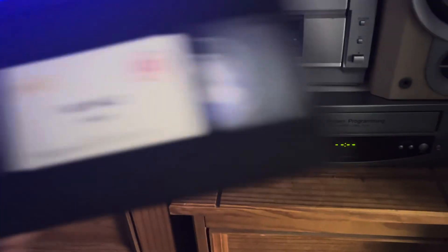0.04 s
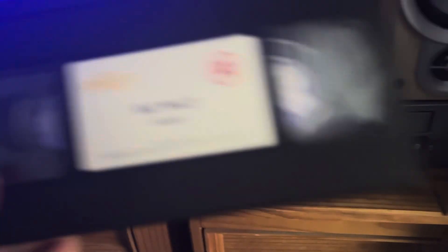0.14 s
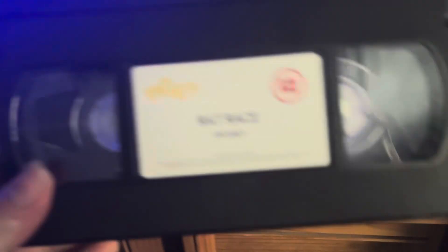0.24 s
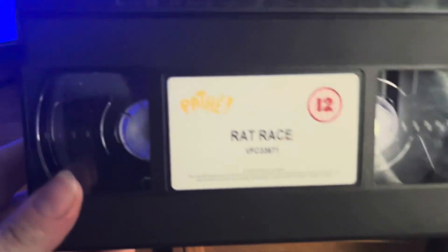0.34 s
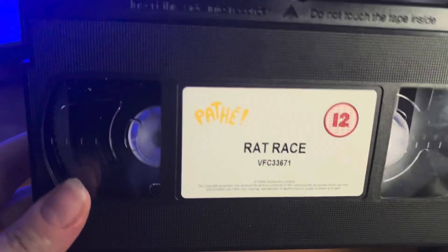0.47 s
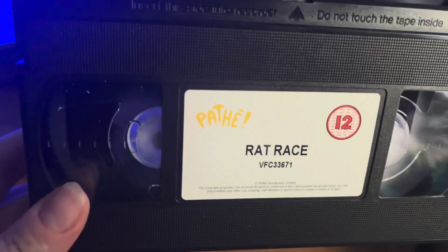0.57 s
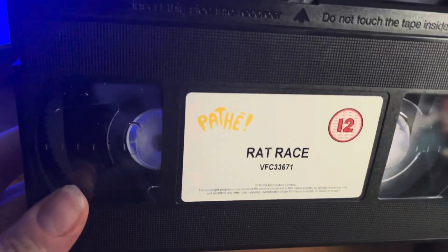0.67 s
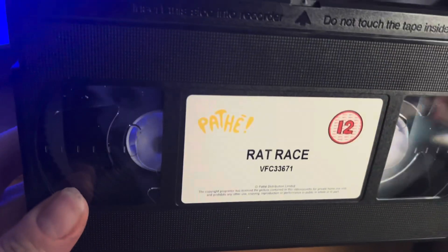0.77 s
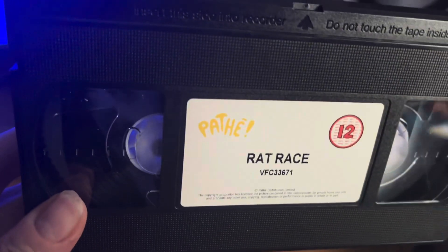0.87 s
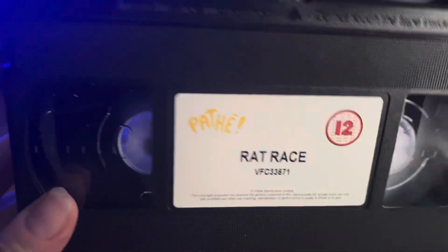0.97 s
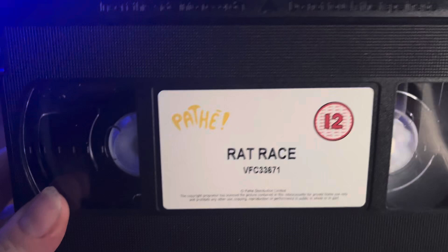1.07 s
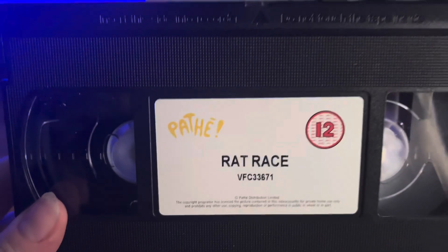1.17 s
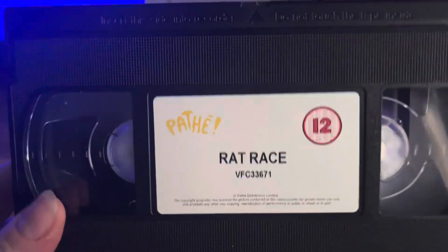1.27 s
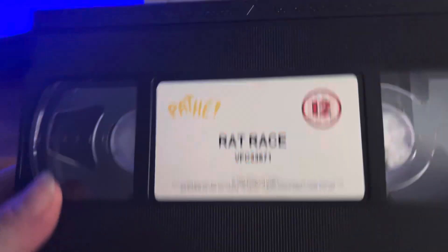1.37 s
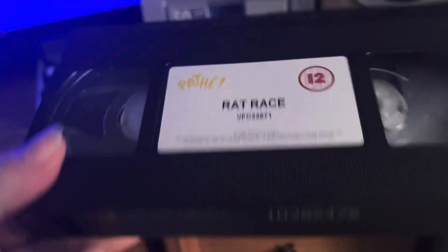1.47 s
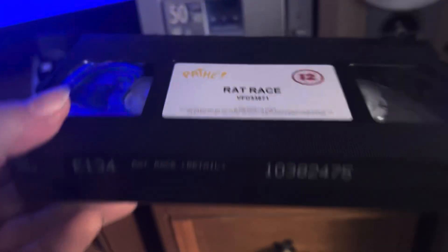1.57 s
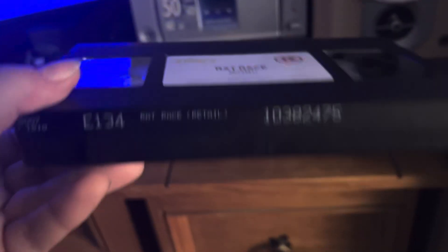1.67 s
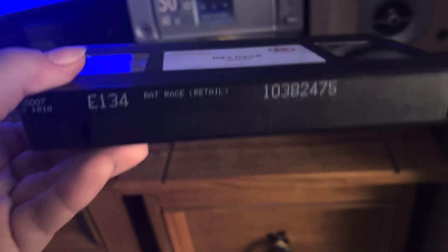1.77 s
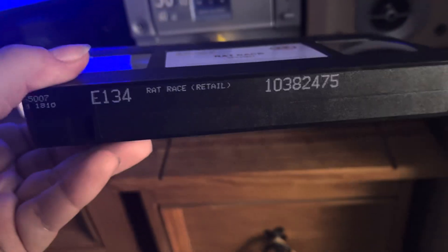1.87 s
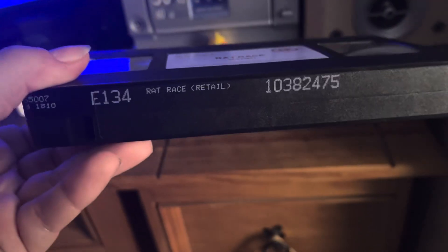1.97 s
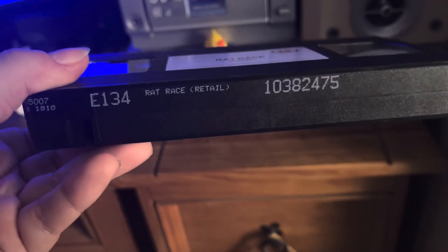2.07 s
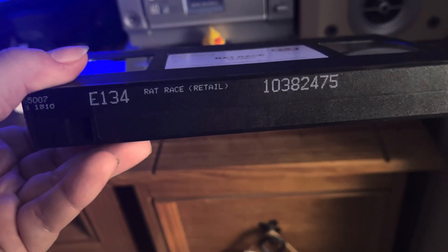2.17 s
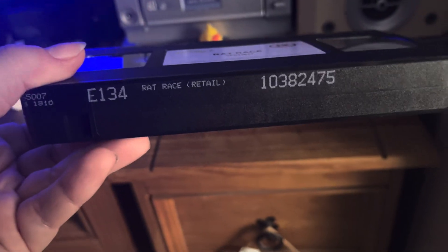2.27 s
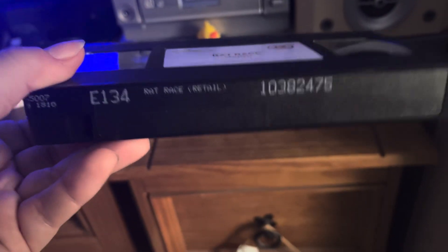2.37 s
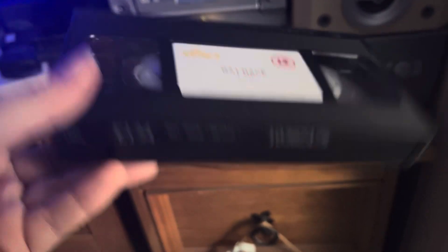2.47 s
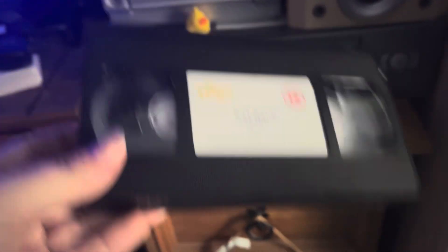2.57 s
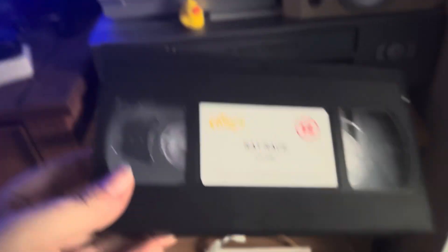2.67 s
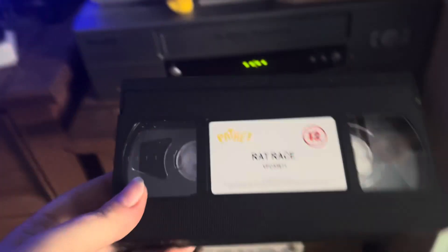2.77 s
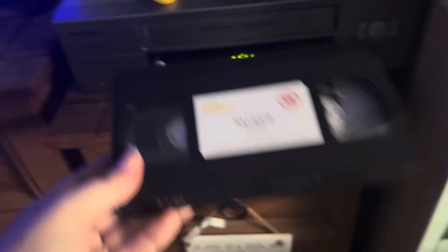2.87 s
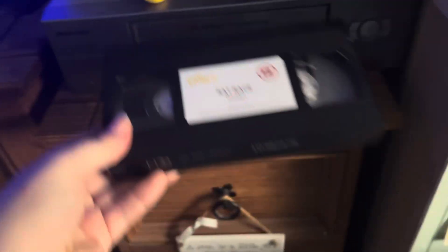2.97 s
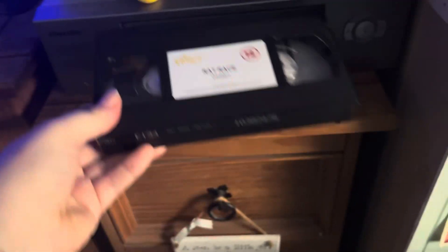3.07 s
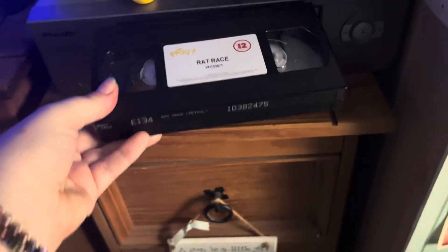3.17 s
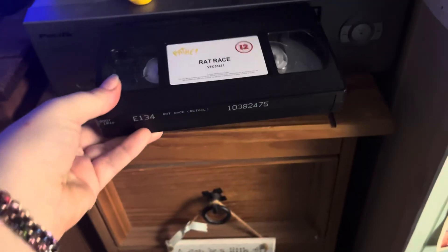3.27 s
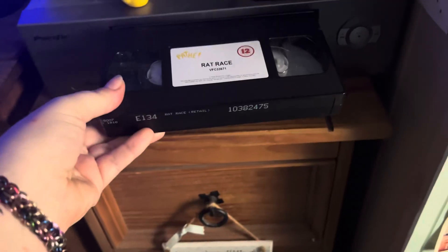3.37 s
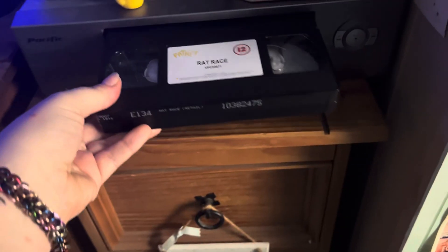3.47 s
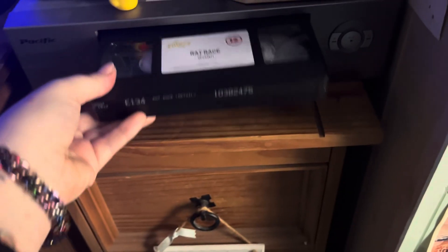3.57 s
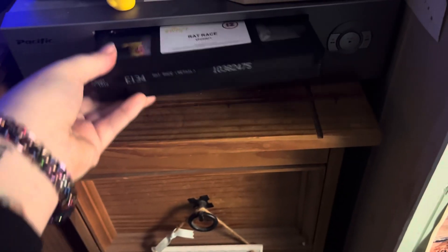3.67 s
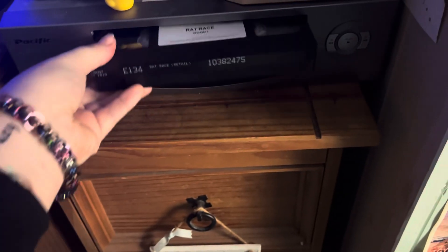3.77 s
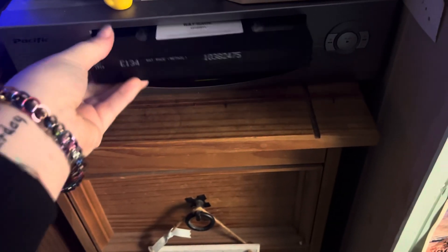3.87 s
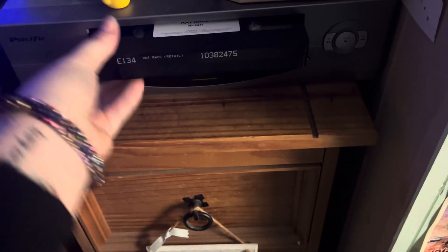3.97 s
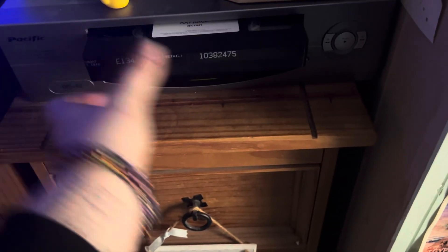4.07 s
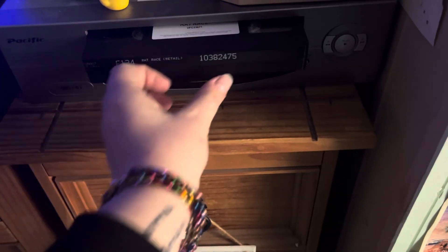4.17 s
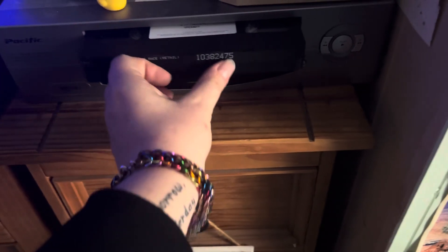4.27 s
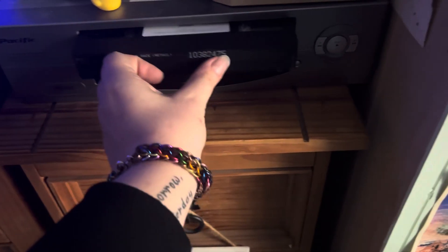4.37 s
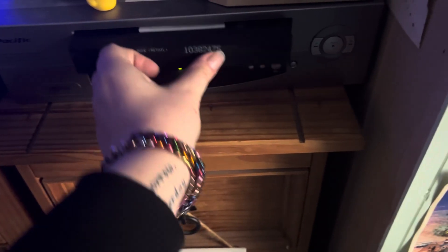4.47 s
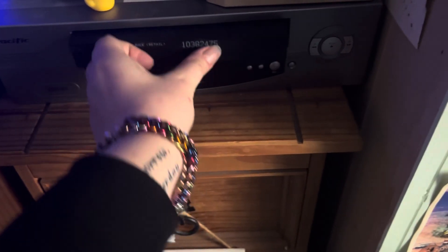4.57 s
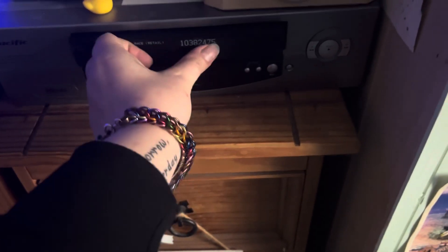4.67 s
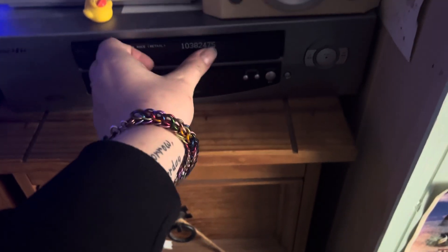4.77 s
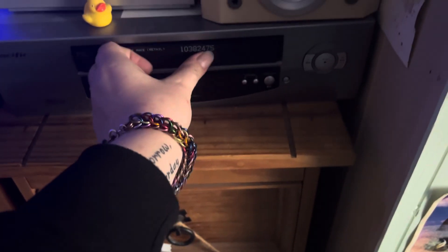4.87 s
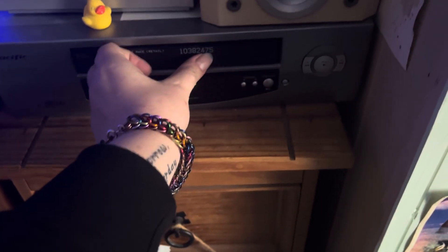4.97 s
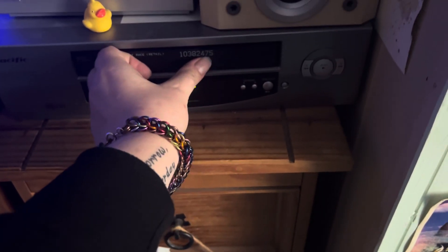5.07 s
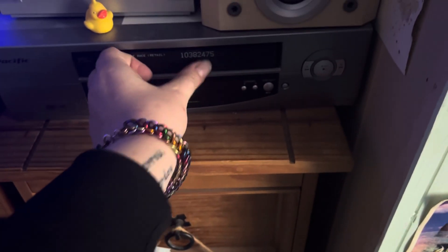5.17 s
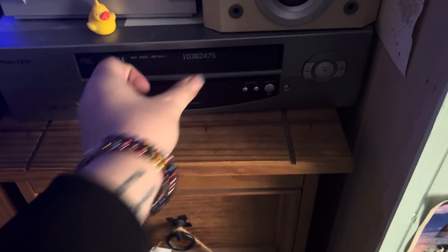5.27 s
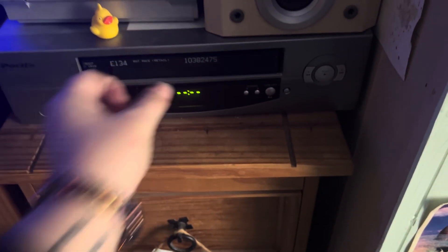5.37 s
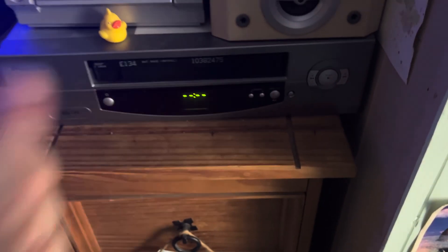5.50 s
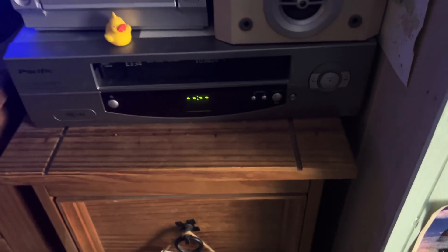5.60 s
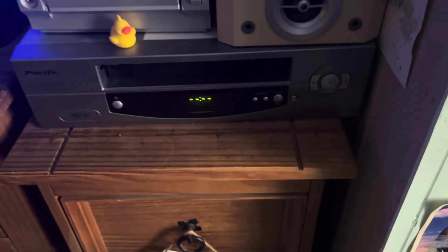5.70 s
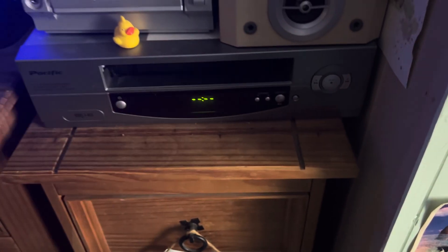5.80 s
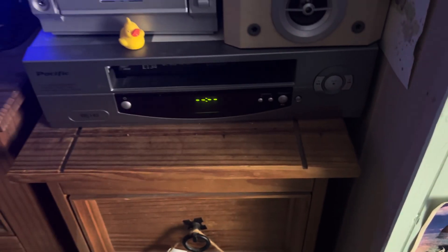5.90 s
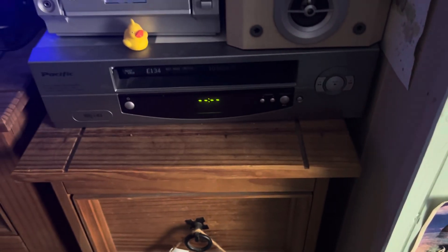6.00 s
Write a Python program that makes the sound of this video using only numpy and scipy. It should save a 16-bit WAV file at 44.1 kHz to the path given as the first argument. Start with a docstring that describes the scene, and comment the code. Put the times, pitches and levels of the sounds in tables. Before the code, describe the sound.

A plastic video cassette creaks in the hand, knocks against a recorder slot, scrapes in, clunks home and is drawn inside with clattering clicks.

```python
"""A small, quietly rumbling room with a wooden cabinet: a plastic video cassette creaks in a hand, is set into
the slot of a recorder, scrapes in, knocks home and is drawn inside by the loading gear. Creaks and knocks are
short noise forces on resonant modes of shell, hollow and cabinet; slides are long gritty forces on the same modes.
Sleeve, fingers and room are shaped noise. An echo tail follows the near sounds; a phone hears all at two ports."""
import sys
import numpy as np
from scipy import signal
from scipy.fft import rfft, irfft, next_fast_len
from scipy.io import wavfile
from scipy.ndimage import uniform_filter1d

SR = 44100
rng = np.random.default_rng(int(sys.argv[2]) if len(sys.argv) > 2 else 0)


def master(y):
    """Save y as 16-bit WAV."""
    cut = np.clip(np.atleast_2d(y).T, -1, 1)
    pcm = np.round(cut * 32767)  # scale
    wavfile.write(sys.argv[1], SR, pcm.astype(np.int16))


N = 266364
SIZE = next_fast_len(N + SR)  # room for the echo tail
HZ = np.maximum(np.fft.rfftfreq(SIZE, 1 / SR), 1)


def undb(db):
    """Decibel law: amplitude gain grows tenfold every 20 dB."""
    return 10 ** (np.asarray(db) / 20)


def level(x, db):
    """Root-mean-square level: scale a signal to it."""
    return x * undb(db) / np.sqrt(np.mean(x ** 2))


def over_hz(table, column):
    """Logarithmic frequency axis: a table column interpolated on it at every bin."""
    table = np.array(table)
    return np.interp(np.log(HZ), np.log(table[:, 0]), table[:, column])


def band(x, hz, width):
    """Simple resonance: gain 1 at the centre, falling to both sides."""
    return signal.lfilter(*signal.iirpeak(hz, hz / width, SR), x)


def flutter(depth_db, rate, size=N):
    """Random amplitude modulation: gains 1 / rate s apart, joined by straight lines."""
    count = int(size * rate / SR) + 2
    gains = undb(depth_db * rng.standard_normal(count))
    return np.interp(np.arange(size) * rate / SR, np.arange(count), gains)


def along(spans, fade_s=.015):
    """Piecewise-linear envelopes: table columns over time, and a gate that opens while a span lasts."""
    t, rows = np.arange(N) / SR, np.vstack(spans)
    gate = sum(np.clip(np.minimum(t - s[0][0], s[-1][0] - t) / fade_s + 1, 0, 1) for s in spans)
    return np.minimum(gate, 1), [np.interp(t, rows[:, 0], c) for c in rows.T[1:]]


# spectral density of room rumble and hiss: pitch_hz [Hz], density_db [relative dB per Hz]
RUMBLE_SPECTRUM = [(30, -78.5), (70, -61), (120, -71), (175, -56.5), (212, -64), (245, -63), (310, -72),
                   (450, -71), (800, -83), (1500, -92), (3000, -101), (6000, -111), (11300, -111),
                   (15000, -118)]
RUMBLE_DB = -55
# faint electrical whines: pitch_hz [Hz], width_hz [Hz], level_db [dB before flicker]
WHINE_BANDS = [(3900, 310, -89.5), (11400, 1300, -93.5)]


def rumble():
    """Coloured noise: bass octaves that flicker independently, with faint narrow-band whines on top."""
    noise = rfft(rng.standard_normal(SIZE)) * undb(over_hz(RUMBLE_SPECTRUM, 1))
    out = irfft(noise, SIZE)[:N]
    for hz in 60 * 2. ** np.arange(4):
        octave = irfft(noise * np.clip(1 - abs(np.log2(HZ / hz)), 0, 1), SIZE)[:N]
        out = out + (flutter(2.76, 11) - 1) * octave
    hiss = rng.standard_normal(N)
    whines = sum(level(band(band(hiss, hz, w), hz, w), db) for hz, w, db in WHINE_BANDS)
    return level(out, RUMBLE_DB) + flutter(0.83, 27.0) * whines


# reverberation time: pitch_hz [Hz], t60_s [s]
REVERBERATION = [(150, .12), (1000, .18), (4000, .16), (12000, .09)]
ROOM_DB = -11  # echo re direct sound


def room_tail():
    """Exponential decay of a diffuse field: spectrum of an echo tail that loses its treble first."""
    t = np.arange(SR // 2) / SR
    tail = np.zeros(len(t))
    for hz in 60 * 2. ** np.arange(9):
        t60 = np.interp(hz, *np.transpose(REVERBERATION))
        octave = band(rng.standard_normal(len(t)), hz, hz)
        tail += octave * np.sqrt(1 / (hz * t60)) * undb(-60 * t / t60)
    tail /= np.sqrt(np.sum(tail ** 2))  # unit energy before the soft start
    return rfft(tail * np.minimum(t / 0.013, 1), SIZE)


# sleeve rustling as the arm reaches out, one list per span: start_s [s], level_db [dB]
SLEEVE_SPANS = [
    [(2.45, -99), (2.8, -80.5), (3.05, -77), (3.25, -75.5)],
]


def sleeve():
    """Friction noise of cloth: many small contacts in one broad band."""
    gate, (db,) = along(SLEEVE_SPANS)
    rustle = band(grit(N, scatter_db=0.5, per_s=170), hz=2092, width=1150)
    return gate * undb(db) * level(rustle, 0)


# fingers slipping off the plastic, one list per span: start_s [s], level_db [dB before flicker]
FINGER_SPANS = [
    [(3.96, -71), (4.11, -71.5), (4.2, -86)],
]
# colour of skin on plastic: pitch_hz [Hz], width_hz [Hz], gain_db [relative dB]
SKIN_BANDS = [(2600, 700, -5), (3200, 800, -4), (5200, 1300, 0), (9000, 6000, -14)]


def fingers():
    """Friction noise of skin on plastic: a soft hiss of overlapping broad bands."""
    gate, (db,) = along(FINGER_SPANS)
    noise = rng.standard_normal(N)
    hiss = sum(undb(g) * band(band(noise, hz, w), hz, w) for hz, w, g in SKIN_BANDS)
    return gate * undb(db) * flutter(2.2, 20) * level(hiss, 0)


def grit(size, scatter_db, per_s):
    """Asperity contact: noise made of small contacts of very unequal strength."""
    hold = int(SR / per_s)
    strength = undb(scatter_db * np.minimum(rng.exponential(size=size // hold + 1), 3.5))
    return level(rng.standard_normal(size) * np.repeat(strength, hold)[:size], 0)


def crack(x, low_hz=5000, high_hz=11500):
    """Contact stiffness: a hard contact has a sharp top, here a high band of its force."""
    x = signal.lfilter(*signal.butter(2, low_hz, "high", fs=SR), x)
    return signal.lfilter(*signal.butter(1, high_hz, fs=SR), x)


CABINET_TOP_HZ = 694


def sluggish(force):
    """Inertia: the heavy cabinet follows only the slow part of a force."""
    return signal.lfilter(*signal.butter(2, CABINET_TOP_HZ, fs=SR), force)


def favour(modes, centre_hz, focus_db, octaves, scatter_db):
    """Selective excitation: the spot that is struck favours the modes near one pitch."""
    near = np.log2(np.array(modes)[:, 0] / centre_hz) / octaves
    return undb(focus_db * np.exp(-near ** 2) + scatter_db * rng.standard_normal(len(modes)))


# modes of cassette shell, hollow and wooden cabinet: pitch_hz [Hz], width_hz [Hz], peak_db [relative dB]
SHELL_MODES = [(1384, 264, 5), (1733, 59, 9), (1884, 79, 5), (2160, 270, 3.5), (2560, 383, 3),
               (2960, 290, 5.5), (3180, 560, 2.5), (3850, 480, 3.5), (4310, 580, -1.5), (5180, 770, -9.5),
               (5290, 81, -2), (7550, 2000, -4.5)]
HOLLOW_MODES = [(479.5, 59, -3), (658.5, 47, -1.5), (743.8, 25, 0), (840, 53, 0), (960, 67, -2.5),
                (1170, 114, -4.5)]
CABINET_MODES = [(95, 57, -15), (154.6, 40, -2), (195, 44, -3), (236, 45, -5), (285.3, 35.6, 2),
                 (312.8, 30.4, 3), (372, 60, -7.5), (432, 47, -5.5)]


def ring(x, modes, gains, detune=0):
    """Modal superposition: a force drives every mode, and neighbours add with opposite signs."""
    shifts = 1 + detune * rng.standard_normal(len(modes))
    out = 0
    for k, ((hz, width, db), gain, shift) in enumerate(zip(modes, gains, shifts)):
        out = out + (-1) ** k * gain * undb(db) * band(x, hz * shift, width)
    return out


# plastic sliding on the guides, pushed by hand, then drawn by the gear, one list per span: start_s [s],
# shell_db [dB before flicker], hollow_db [dB re shell], cabinet_db [dB re shell]
SLIDE_SPANS = [
    [(3.28, -60, 11.5, -3), (3.39, -56, 6.5, 5), (3.46, -61, 15.5, 16.5), (3.53, -52.5, 8, 12.5),
     (3.57, -45, 11, -1), (3.62, -38.5, 3, -7.5), (3.66, -38.5, 0, 6.5), (3.72, -51.5, 0.5, 8.5),
     (3.77, -61.5, 0, 9), (3.83, -57.5, 6, 1)],
    [(4.37, -74.5, 1, 10), (4.44, -63, 4.5, 2.5), (4.51, -52.5, -5.5, 13.5), (4.56, -55.5, 5, 5.5),
     (4.62, -51, 1.5, 6), (4.65, -61, 4.5, 22)],
    [(4.73, -63, 7.5, 20), (4.78, -63.5, 5.5, 13.5), (4.83, -69, -5, 8.5)],
    [(4.98, -88, 0.5, 21.5), (5.04, -77, 13.5, 19), (5.12, -85.5, 13, 26.5), (5.24, -85.5, 18, 31.5),
     (5.34, -74, 4.5, 22.5)],
    [(5.365, -60, 8, 12), (5.41, -53, -2.5, 3.5), (5.46, -69, -5, 13), (5.54, -57.5, 2.5, 10),
     (5.62, -65.5, 5, 16), (5.67, -69.5, 8, 28.5), (5.71, -59, 2, -2)],
    [(5.738, -42, -8, 0.5), (5.8, -39.5, -9, -7.5), (5.86, -48.5, -3, 9.5), (5.905, -70.5, 8, 15),
     (5.95, -41, -6.5, 8.5), (6.04, -56, -2, 3)],
]
SLIDE_FROM = int(3.2 * SR)  # samples of silence before the first slide
SLIDE_CRACK_DB = -17.5  # re shell


def slide():
    """Stick-slip friction of plastic on plastic: the moving contact wakes now one mode, now another."""
    gate, (db, hollow_db, cabinet_db) = along(SLIDE_SPANS)
    size = N - SLIDE_FROM

    def rub():
        """Friction force: dense, uneven contacts."""
        return grit(size, scatter_db=2.5, per_s=500)

    def shifting(force, modes):
        """Moving excitation: every mode's gain wanders by itself."""
        return ring(force, modes, [flutter(2.6, 60, size) for _ in modes])

    def place(x):
        """Normalisation: set to 0 dB and delay to the first slide."""
        return np.r_[np.zeros(SLIDE_FROM), level(x, 0)]

    shell = place(shifting(rub(), SHELL_MODES))
    top = undb(SLIDE_CRACK_DB) * place(crack(rub()))
    hollow = undb(hollow_db) * place(shifting(band(rub(), hz=780, width=550), HOLLOW_MODES))
    cabinet = undb(cabinet_db) * place(shifting(sluggish(rub()), CABINET_MODES))
    grip = flutter(2.5, 120)  # the plastic catches and lets go in ragged bursts
    return gate * grip * undb(db) * (shell + top + hollow + cabinet)


FOCUS_DB, FOCUS_DB_PER_S = 4.5, 17.5  # a long, soft contact stays on one spot and picks out fewer modes
CRACK_S = 0.19  # the crack's 60 dB decay never outlasts this
DETUNE = .03 / 2  # each contact shifts the modes of hollow and cabinet by about this share


def add(out, hollow_hz, cabinet_hz, s, db, centre_hz, hollow_db, crack_db, cabinet_db, rattle_ms, rise_ms):
    """Forced vibration: one short rattle of force shakes shell, hollow and cabinet."""
    t = np.arange(SR // 6) / SR
    rise, fall = max(rise_ms, .2) / 1000, max(rattle_ms, 4) / 1000  # s

    def force(lag, slow):
        """Transient force: builds up after a lag, then loses 60 dB in slow * fall seconds."""
        build = np.minimum(t / (rise + lag), 1) ** 2
        decay = undb(-60 * np.maximum(t - rise - lag, 0) / (slow * fall))
        return grit(len(t), scatter_db=1.5, per_s=970) * build * decay

    # a soft contact has little crack and a dull push
    edge_hz = np.clip(11000 * undb(crack_db / 4.8), centre_hz, 12000)
    push = signal.lfilter(*signal.butter(2, edge_hz, fs=SR), force(0, 1))
    focus_db = FOCUS_DB + FOCUS_DB_PER_S * fall
    shell_gains = favour(SHELL_MODES, centre_hz, focus_db, octaves=.22, scatter_db=2.5)
    hollow_gains = favour(HOLLOW_MODES, hollow_hz, focus_db=11, octaves=.15, scatter_db=1.5)
    cabinet_gains = favour(CABINET_MODES, cabinet_hz, focus_db=10, octaves=.2, scatter_db=1.5)

    shell = ring(push, SHELL_MODES, shell_gains)
    hollow = ring(band(force(.002, .55), hollow_hz, hollow_hz), HOLLOW_MODES, hollow_gains, DETUNE)
    top = crack(force(0, min(.6, CRACK_S / fall)))
    cabinet = ring(sluggish(force(.008, .9)), CABINET_MODES, cabinet_gains, DETUNE)
    i = int(s * SR)
    for part, part_db in [(shell, 0), (hollow, hollow_db), (top, crack_db), (cabinet, cabinet_db)]:
        peak = np.sqrt(uniform_filter1d(part ** 2, size=300).max())  # highest short-time rms
        out[i:i + len(t)] += (part * undb(db + part_db) / peak)[:N - i]


# cassette creaking in the hand: start_s [s], shell_db [dB], ring_hz [Hz], hollow_db [dB re shell],
# crack_db [dB re shell], rattle_ms [ms], rise_ms [ms], hollow_hz [Hz]
CREAK_EVENTS = [(0.204, -60, 2700, 1, -56, 45, 1.5, 680), (0.408, -53, 2310, 5.5, -3, 110, 1.3, 763),
                (0.881, -63.5, 5100, -6, -24, 200, 7.3, 700), (1.277, -65.5, 3160, -3, 0, 190, 0.92, 696),
                (1.448, -44.5, 2400, -0.5, -16, 125, 1.4, 667), (1.543, -57, 2220, -19, -16, 12, 1.5, 700),
                (1.593, -65.5, 2370, -18, -9, 150, 3.8, 700), (1.744, -72, 3960, -26, -29, 200, 22, 700),
                (1.87, -68, 5440, -20, -29, 180, 32, 700), (1.905, -66, 2860, -4, -28, 110, 6, 700),
                (2.878, -65.5, 3100, -4, -14, 160, 10, 705)]


def creaks():
    """Stick-slip release in the hand: each creak shakes the cassette but not the cabinet."""
    out, away_db = np.zeros(N), -np.inf
    for s, db, ring_hz, hollow_db, crack_db, rattle_ms, rise_ms, hollow_hz in CREAK_EVENTS:
        add(out, hollow_hz, hollow_hz, s, db, ring_hz, hollow_db, crack_db, away_db, rattle_ms, rise_ms)
    return out


# knocks against the machine: start_s [s], shell_db [dB], ring_hz [Hz], crack_db [dB re shell],
# weight_db [cabinet, dB re shell], rattle_ms [ms], hollow_hz [Hz], cabinet_hz [Hz]
KNOCK_EVENTS = [(3.259, -42.5, 2630, -15, -3.5, 118, 687, 311),
                (3.305, -49.5, 3720, -50, 6.5, 50, 660, 290),
                (3.343, -28.5, 2840, -6.5, -4, 53, 692, 215.3), (3.485, -50, 2900, -49.5, 3, 30, 700, 300),
                (3.559, -42, 1750, -31, -6, 54, 830, 300), (3.632, -37.5, 2000, -11, 4, 27, 830, 198),
                (3.665, -37.5, 2230, 4, 4.5, 54, 500, 195), (3.699, -51.5, 1900, -25, 12.5, 21, 810, 297),
                (3.79, -58, 1520, -41, 19.5, 40, 685, 294), (3.814, -53, 2200, -25, -5, 50, 900, 294),
                (3.84, -53, 2620, -10, 12.5, 220, 517, 189), (3.87, -34.5, 2980, -1, 1.5, 106, 699, 223.5),
                (3.876, -43, 3800, -3, 15.5, 54, 710, 292), (3.915, -52, 3200, -23, 4, 87, 700, 295),
                (4.212, -70.5, 3100, -5, -8, 350, 490, 240), (4.251, -69, 2620, -50, 16, 60, 880, 197),
                (4.323, -62.5, 2420, -30, 15.5, 185, 704, 198), (4.417, -57, 2140, -29, 15, 36, 690, 350),
                (4.496, -47, 1720, -22, 5.5, 130, 790, 290), (4.595, -40, 3600, -18, -13, 40, 935, 300),
                (4.66, -38.5, 2690, -3, 7.5, 140, 774, 226), (4.673, -26.5, 2820, 1, -3.5, 82, 904, 327),
                (4.833, -62.5, 3830, -24.5, -5, 67, 500, 158),
                (4.881, -59.5, 2560, -19, -15, 180, 502, 152), (5.137, -66.5, 3980, -21, -16, 68, 508, 200),
                (5.181, -70, 1440, -70, 20, 110, 800, 217.5), (5.374, -40, 4260, 7, 0.5, 77, 885, 200),
                (5.424, -56.5, 2210, -23, 16, 42, 1080, 390), (5.458, -55, 2200, -37, 2, 43, 980, 300),
                (5.497, -47, 3800, -18, -10, 77, 487, 330), (5.506, -47, 3770, -27, 10, 36, 1030, 320),
                (5.571, -49, 2900, -8, -6, 200, 500, 318), (5.592, -44.5, 2080, -32, 9.5, 64, 970, 297),
                (5.637, -44.5, 2230, -35, 2.5, 68, 970, 282), (5.729, -47, 1800, -13, 1.5, 33, 915, 290),
                (5.738, -43, 2530, -14, 3, 98, 925, 292), (5.776, -34, 2580, -8, 4.5, 133, 990, 312),
                (5.826, -37, 3850, -7.5, -1.5, 110, 1080, 365), (5.927, -55, 3370, 3.5, 14, 120, 880, 310),
                (5.961, -31.5, 4080, -9, -0.5, 90, 1000, 310), (5.967, -41.5, 1690, -1, 16, 62, 1000, 310)]
KNOCK_HOLLOW_DB, KNOCK_HOLLOW_PER_WEIGHT, KNOCK_HOLLOW_PER_CRACK = -3.5, 0.38, -0.21
RISE_MS, SOFT_MS = 1.1, 101  # a knock builds up in RISE_MS, plus (rattle / SOFT_MS) squared in ms


def knocks():
    """Impact coupling: each knock shakes cassette and cabinet; heavy, soft ones sound hollow."""
    out = np.zeros(N)
    for s, db, ring_hz, crack_db, weight_db, rattle_ms, hollow_hz, cabinet_hz in KNOCK_EVENTS:
        hollow_db = KNOCK_HOLLOW_DB + KNOCK_HOLLOW_PER_WEIGHT * weight_db + KNOCK_HOLLOW_PER_CRACK * crack_db
        rise_ms = RISE_MS + (rattle_ms / SOFT_MS) ** 2
        add(out, hollow_hz, cabinet_hz, s, db, ring_hz, hollow_db, crack_db, weight_db, rattle_ms, rise_ms)
    return out


# the two ports: pitch_hz [Hz], right_lead_rad [rad], near_likeness [0-1], room_likeness [0-1],
# left_minus_right_db [dB]
PORT_FIELD = [(60, 0, .98, .94, 1), (300, -.3, .985, .8, 2.1), (800, -.4, .88, .4, 4.5),
              (1300, -1.6, .2, .2, 3), (1900, -.2, .85, .55, 2), (3000, -.8, .75, .5, 3),
              (4500, -.1, .55, .25, 3), (6000, 1, .7, .4, 2.5), (7800, 3.05, .99, .99, .5),
              (8800, 3.25, .99, .99, 0), (10000, 4.7, .8, .75, 0), (11200, 6.28, .99, .99, 0),
              (12800, 6.4, .98, .98, 0), (13800, 7.6, .7, .6, 0), (15000, 9.4, .97, .95, 0)]


def ports(shared, other, likeness):
    """Partial coherence: both ports share one part of the field, shifted in phase, and differ in another."""
    likeness = np.clip(likeness, 0, 1)
    mid = np.sqrt((1 + likeness) / 2) * shared
    side = np.sqrt((1 - likeness) / 2) * other
    turn = np.exp(.5j * over_hz(PORT_FIELD, 1)) * undb(-over_hz(PORT_FIELD, 4) / 2)
    return irfft(np.array([(mid + side) / turn, (mid - side) * turn]), SIZE)[:, :N]


def near_field():
    """Direct plus reverberant sound: spectrum of all near sources with their room echo."""
    near = sleeve() + fingers() + slide() + creaks() + knocks()
    return rfft(near, SIZE) * (1 + undb(ROOM_DB) * room_tail())


def scene():
    """Superposition: near sounds with their room echo, over the room noise."""
    # the bodies radiate unlike detail towards each port: one field is shared, one is not
    near = ports(near_field(), near_field(), over_hz(PORT_FIELD, 2))
    air = ports(rfft(rumble(), SIZE), rfft(rumble(), SIZE), over_hz(PORT_FIELD, 3))
    return near + air


TOP_HZ = 15600


def record(dry):
    """Band limitation: the phone cuts the top with a steep low-pass."""
    return signal.sosfilt(signal.ellip(14, .2, 80, TOP_HZ, fs=SR, output="sos"), dry)


dry = scene()
out = record(dry)
master(out)
```